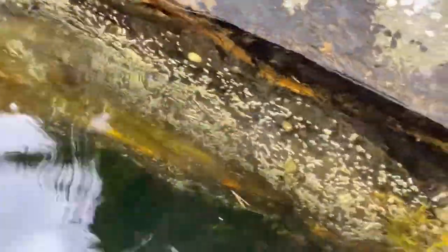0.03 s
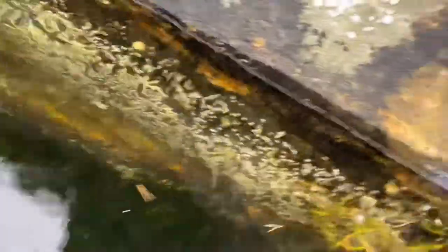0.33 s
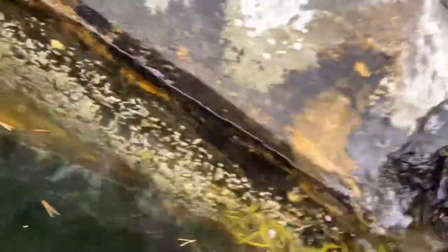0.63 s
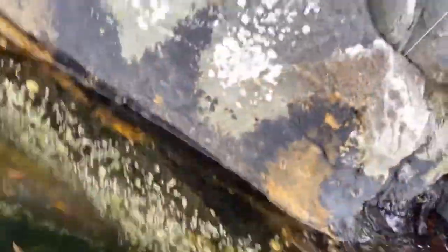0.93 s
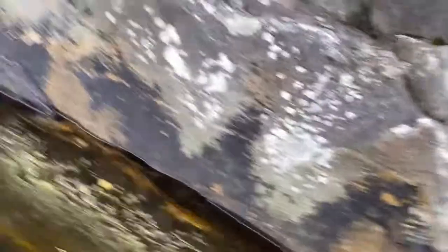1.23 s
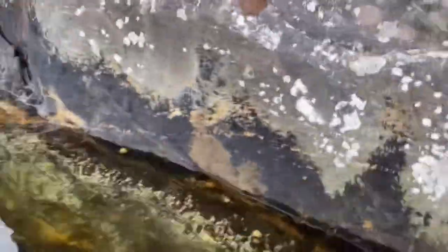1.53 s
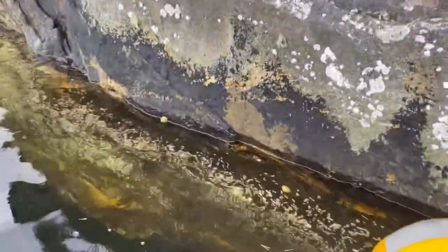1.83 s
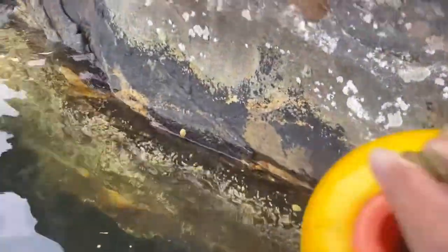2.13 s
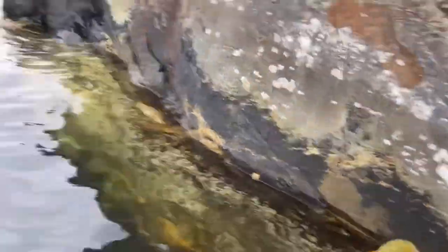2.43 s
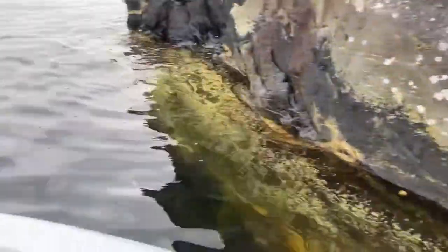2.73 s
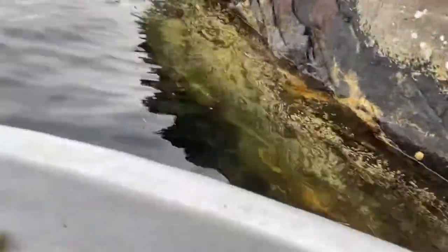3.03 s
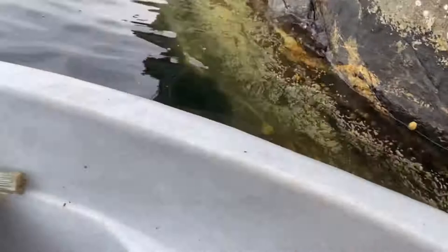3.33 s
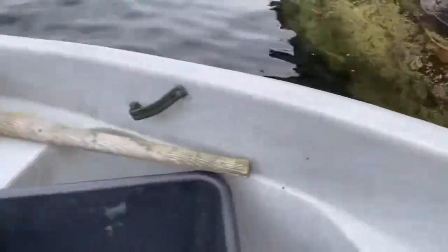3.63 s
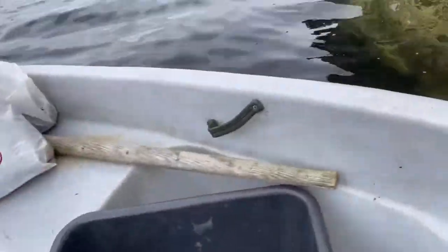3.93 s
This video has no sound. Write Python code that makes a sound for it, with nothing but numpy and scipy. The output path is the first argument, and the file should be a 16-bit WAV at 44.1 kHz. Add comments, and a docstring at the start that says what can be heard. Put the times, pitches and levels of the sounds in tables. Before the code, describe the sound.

Water washing and dripping beside a boat, with low rumble and gear knocking the hull.

```python
"""A small open boat lies beside a rock face. From the start wind rumbles, a low motor-like hum grows,
and water washes and drips on the rock, its bubbles ringing as tiny resonators. Gear bumps the hull,
softly at first, each impact exciting the hull's damped modes. Near 3.3 s and 3.6 s come two hard
clattering knocks that make the recorder's gain control duck."""
import sys
import numpy as np
from scipy import signal
from scipy.fft import rfft, irfft
from scipy.io import wavfile
from scipy.ndimage import uniform_filter1d

SR = 44100
rng = np.random.default_rng(int(sys.argv[2]) if len(sys.argv) > 2 else 0)


def inscribe(sig):
    """Save sig as 16-bit PCM at rate SR to the path in sys.argv[1].

    A 1-D sig is mono; a 2-D sig holds one channel per row.
    Samples are clipped to [-1, 1] before scaling.
    """
    pcm = np.round(np.clip(np.atleast_2d(sig).T, -1, 1) * 32767)
    wavfile.write(sys.argv[1], SR, pcm.astype(np.int16))


N = 176400
T = np.arange(N) / SR

# normal modes of the hull (frequency [Hz], level [dB], t60 [s])
HULL_MODES = [(71.9, -5, 0.99), (84.6, 7, 0.19), (107.2, 4, 0.26), (116.8, -28, 0.39), (169, -25, 0.2),
              (221, -5.5, 0.23), (259.6, -6, 0.3), (306, -16.5, 0.48), (359, -7, 0.19), (397, -1.5, 0.077),
              (463, -28.5, 0.21), (512, -14.5, 0.085), (637, -17.5, 0.15), (773, -18, 0.09)]
# bands of dense panel vibration (centre [Hz], level [dB], t60 [s])
PANEL_BANDS = [(47, -13, 0.41), (95.6, -8, 0.67), (192, -6, 0.41), (417, -9.5, 0.27), (850, -13.5, 0.11),
               (1690, -15, 0.15), (3130, -1, 0.1)]
# blows on the hull (time [s], level [dB], bass boost [dB], low-pass [Hz], note [Hz], note level [dB],
# bending wave level [dB], sweep time [s], twice the pan [dB])
KNOCKS = [(0.277, -28, -2, 1320, 1310, -6.5, -28, 0.0064, 8),
          (0.644, -29, -1, 119, 66.8, 19.5, -8, .008, 2), (.733, -27, 0, 308, 170.4, 11, 2, 0.00595, -17),
          (1.424, -24.5, 6, 370, 147.6, 11, 6.5, 0.0052, -1),
          (1.854, -20.5, 0, 1120, 521, 0, 4, 0.0059, -0.5),
          (1.866, -23, -1, 298, 227, 6.5, -13, 0.0062, -1), (1.916, -24, 5, 1300, 970, -11, 17, 0.0062, -4),
          (1.923, -16, 3.5, 203, 119.7, 2, -14, .006, 3), (1.947, -22, -1, 241, 201, 8, -4, 0.0041, -4),
          (2.238, -26.5, 6, 616, 208, 4, 0, 0.0061, -4), (2.257, -22, 5, 426, 181.6, 8, -3, 0.00713, 1),
          (2.532, -34, 16, 600, 392, 8, -16, 0.00626, -3), (2.755, -24, -4, 585, 97.6, 9, -10, 0.0066, -8),
          (3.121, -16.5, -9, 328, 372, 5.5, 10.5, 0.0044, -6),
          (3.144, -19.5, -2.5, 230, 103, 10.5, 10.5, 0.0044, 2),
          (3.165, -18.5, 10, 1340, 773, -8.5, 3.5, 0.00612, 3),
          (3.19, -26.5, 7, 258, 80.6, 7, 1, 0.0039, -6), (3.229, -17, 6, 330, 363, 1.5, -10, .006, -6),
          (3.25, -19.5, -5, 800, 584, -2, -3, 0.0052, -7),
          (3.265, -2.5, -1, 845, 717.5, -3.5, 4.5, .005, -5.5),
          (3.277, -12, 0, 500, 425, 6.5, 15.5, 0.0039, 3),
          (3.305, -13.5, -3, 388, 301, 9.5, -5, 0.0058, -2),
          (3.345, -16, -3.5, 380, 105, 10, -10, 0.0055, 5), (3.431, -27, 19, 403, 107.4, 5, -6, 0.0056, -1),
          (3.574, -12, 4.5, 700, 630, 3, 8.5, 0.00815, -6.5),
          (3.597, -9, -2, 528, 319, 3.5, -0.5, 0.0063, -6),
          (3.628, -13.5, 2.5, 320, 81, 1, 4, 0.00506, 0.5), (3.655, -16, 6.5, 580, 112, -3, -11, .0075, -4),
          (3.707, -13.5, -7, 600, 303, 9, -8, 0.0068, 6), (3.733, -19.5, 2.5, 308, 308, -14, 3, 0.0052, 0),
          (3.915, -22.5, -22, 915, 480, 2, -8, 0.0058, -8),
          (3.928, -15.5, 6, 330, 90.3, 1, 2.5, 0.0056, 0.5)]
def knock(db, bass_db, lowpass_hz, note_hz, note_db, bend_db, sweep_s):
    """Modal response: a blow rings the hull and the struck spot; soft contacts miss the high modes."""
    t = T[:SR // 2]
    def envelope(hz, level_db, t60):
        return amp(level_db - 60 * t / t60) * (1 - np.exp(-t * hz))  # builds over one cycle
    ring = np.zeros((2, len(t)))
    for hz, level_db, t60 in HULL_MODES:
        detuned_hz = hz * (1 + 0.0097 * rng.standard_normal())
        ring += envelope(hz, level_db, t60) * np.sin(2 * np.pi * (detuned_hz * t + rng.random()))
    for hz, level_db, t60 in PANEL_BANDS:
        band = by_hz([(hz / 2, 0), (hz, 1), (hz * 2, 0)], len(t))
        contact = envelope(hz, level_db=-8.5, t60=0.055)
        ring += (envelope(hz, level_db, t60) + contact) * noise(band, len(t))
    bass_shelf = amp(bass_db / (1 + (np.fft.rfftfreq(SR, 1 / SR) / 162) ** 4))  # corner at 162 Hz
    ring = irfft(rfft(ring, SR) * bass_shelf)[:, :len(t)]
    ring = signal.sosfilt(signal.butter(3, lowpass_hz, fs=SR, output="sos"), ring)
    note = envelope(note_hz, note_db, t60=0.048 + 14 / note_hz) * np.sin(2 * np.pi * note_hz * t)
    return amp(db) * (amp(-3) * ring + note + bending_wave(bend_db, sweep_s))


def bending_wave(db, sweep_s, end_hz=67.8, fall_hz=892):
    """Dispersion: treble outruns bass through the hull, giving one short falling thud."""
    sweeps = T[:SR // 2] / sweep_s
    cycles = np.cumsum(end_hz + fall_hz * np.exp(-sweeps)) / SR
    age = sweeps / 2.47  # 1 at the envelope's peak
    arch = age * np.exp((1 - age ** 2) / 2)
    return amp(db) * arch ** 3 * np.sin(2 * np.pi * cycles)


# spectrum of a clack's sharp edge (frequency [Hz], level [dB])
EDGE_SPECTRUM = [(300, 8.5), (1200, 4), (3000, 2.5), (4500, 2), (6500, 6.5), (9000, -0.5), (12800, 0.5),
                 (14200, -2), (16000, -37)]
# clacks of gear and slaps of water (time [s], level [dB], pitch [Hz], edge level [dB], pan [dB])
CLACKS = [(0.165, -27, 2800, -1.5, -3), (0.238, -39.5, 5800, 1, -1), (0.2785, -28, 3280, -1.5, -3),
          (0.3157, -25.5, 3860, -7, 1), (0.595, -37, 3980, 2, -3), (.7113, -32, 3330, -9, -2),
          (.731, -41.5, 4960, 5.5, 6), (0.8104, -32.5, 3390, -1.5, 1), (0.8985, -16.5, 3370, -6.5, 2),
          (0.9132, -41, 6500, 2, 0), (0.9248, -36, 7900, 4, 4), (.9375, -42, 6260, -8, 3),
          (.964, -36, 11200, 3, -2), (1.001, -42, 13000, 1, 0), (1.0224, -30, 4350, 0.5, -1),
          (1.1689, -35.5, 2090, 2, -1), (1.1887, -23.5, 4200, -17, -2), (1.424, -41, 2580, 6, -6),
          (1.473, -50, 2980, -4, -5), (1.644, -36, 2800, -5, -4), (1.817, -43, 4500, -14, 2),
          (1.855, -29.5, 2010, -28, 0), (1.9052, -29, 3940, -11, 1), (1.973, -39.5, 4600, -20, 0),
          (2.03, -37.5, 3120, 3, 0), (2.062, -40.5, 4150, -12, 0), (2.08, -33, 2010, -13, 2),
          (2.092, -34.5, 2680, -12, -2), (2.2379, -29.5, 2350, -5.5, -3.5), (2.2696, -23, 2170, 1.5, -4.5),
          (2.2772, -39.5, 2100, 10, 9), (2.29, -38, 2580, 3, -4), (2.356, -44, 3540, 1, -1),
          (2.413, -45.5, 4200, 7, 5), (2.491, -40.5, 6050, -9, 5), (2.767, -34.5, 3380, -6, -10),
          (2.978, -30, 2170, 0, 0), (3.12, -26, 1810, -12.5, -1), (3.168, -31, 1730, -23, 1),
          (3.2135, -29.5, 6600, -3, -1), (3.251, -39, 1560, 8.5, 1), (3.2655, -15, 3060, 1.5, 0),
          (3.279, -30, 2980, 5, -1), (3.4602, -39, 2000, 9.5, -4), (3.5734, -6.5, 2200, -3.5, 2.5),
          (3.5732, -11, 3050, -10.5, -1), (3.576, -16, 1200, -28, -8), (3.6027, -23, 1870, 1.5, -10),
          (3.607, -33, 6000, 11, 5), (3.6558, -16.5, 2000, -13, -0.5), (3.708, -25.5, 2000, -12, -3)]
def clack(db, hz, edge_db, q=5.3, rise_s=0.00043):
    """Impulse response: a broadband edge, a damped resonance, then scattering from boat and rock."""
    n = SR // 5
    t, f = T[:n], np.fft.rfftfreq(n, 1 / SR) + 1
    def burst(spectrum, level_db, t60):
        return noise(spectrum, n) * amp(level_db - 60 * t / t60)
    resonance = 1 / (1 + (q * (f / hz - hz / f) / 2) ** 2)
    resonance /= 1 + (f / hz / 2) ** 4  # steeper upper skirt
    edge = amp(by_hz(EDGE_SPECTRUM, n))
    direct = burst(resonance, 0, t60=0.018) + burst(edge, edge_db, t60=0.013)
    scatter = burst(resonance + 0.5 * amp(edge_db) * edge, -17, t60=0.11)
    return amp(db) * (direct + scatter) * (1 - np.exp(-t / rise_s))


# spectra of the moving water (frequency [Hz], level [dB])
WASH_SPECTRUM = [(700, -4.5), (1300, -5), (2050, -0.5), (2800, -4), (4000, -5.5), (5000, -6), (7000, -10),
                 (8200, -5.5), (9500, -54), (16000, -63)]
SPRAY_SPECTRUM = [(6000, -26), (9200, -12), (10500, -10), (12900, -6), (13800, -9), (15000, -23),
                  (16500, -35)]
GURGLE_SPECTRUM = [(250, -7), (600, -1.5), (1000, 2.5), (1500, -1), (2500, -32)]
HOLLOW_SPECTRUM = [(1300, -27), (1750, -5.5), (2050, -4), (2350, -10), (2900, -33)]
# envelopes of the spray and the hollow resonance between boat and rock (time [s], relative level [dB])
SPRAY_LEVEL = [(0, -83.5), (0.15, -58), (0.42, -59), (0.57, -51), (0.7, -61), (0.84, -55), (0.92, -44),
               (1.02, -56), (1.1, -73), (1.2, -58), (1.55, -73), (1.76, -55), (1.85, -72), (1.97, -45.5),
               (2.15, -64), (2.27, -80), (2.58, -64), (2.77, -53), (2.88, -64), (3.03, -50), (3.2, -53),
               (3.32, -75), (3.42, -75), (3.55, -56), (3.61, -60.5), (3.75, -58), (3.98, -58)]
HOLLOW_LEVEL = [(0, -64), (1.0, -56.5), (1.6, -59), (2.08, -52.5), (2.25, -55), (2.7, -53.5), (3.0, -61.5),
                (3.2, -47), (3.35, -58), (3.65, -50.5), (4.0, -54)]
# envelopes of wash and gurgle (time [s], relative wash level [dB], relative gurgle level [dB])
WATER_LEVELS = [(0.0, -61.5, -60.5), (0.17, -54, -52), (0.32, -52.5, -59), (0.6, -50.5, -58.5),
                (0.88, -51, -52.5), (1.0, -49.5, -54), (1.26, -53, -55), (1.45, -52, -57.5),
                (1.7, -59, -57.5), (1.96, -52.5, -55.5), (2.28, -58.5, -56.5), (2.39, -54, -52),
                (2.85, -52, -52), (3.13, -47, -46), (3.25, -47, -47.5), (3.35, -58, -47), (3.5, -50, -49.5),
                (3.63, -43.5, -35), (3.77, -51.5, -47.5), (4.0, -49, -47)]
def water():
    """Amplitude modulation: four noises swell on their own curves; the hiss dips briefly after 3.3 s."""
    wash = patchy_noise(WASH_SPECTRUM) * amp(over_time(WATER_LEVELS) - 1)
    spray = patchy_noise(SPRAY_SPECTRUM) * amp(over_time(SPRAY_LEVEL) - 7)
    gurgle = patchy_noise(GURGLE_SPECTRUM) * amp(over_time(WATER_LEVELS, column=2) + 1)
    hollow = patchy_noise(HOLLOW_SPECTRUM) * amp(over_time(HOLLOW_LEVEL))
    return (wash + spray + gurgle + hollow) * amp(2.5 * drift(rate_hz=18.7))


# envelope of the fizz against the wash (time [s], relative level [dB])
FIZZ_LEVEL = [(0, -1), (1.2, 0), (2.2, -2), (2.9, 1), (4.0, -4.5)]
def fizz(bubbles_per_s=380, splashes_per_s=16, centre_hz=3084, trials=2400):
    """Shot noise: tiny bubbles and splashes occur at random, their level following the wash."""
    out = np.zeros((2, N))
    level_db = over_time(WATER_LEVELS) + over_time(FIZZ_LEVEL)
    uniform, normal = rng.random((trials, 3)), rng.standard_normal((trials, 3))
    for (when, chance, rarity), (pitch, life, side) in zip(uniform, normal):
        s, db = when * N / SR, level_db[int(when * N)]
        hz = np.clip(centre_hz * 2 ** (0.85 * pitch), 500, 9000)
        strength = min(-np.log(rarity), 3.5)
        if chance < bubbles_per_s * N / SR / trials:
            t60 = 23 / hz * np.exp(0.5 * life)  # about 23 cycles
            add(out, s, bubble(db + 1.5 + 4 * strength, hz, t60, glide=1.5), pan_db=3 * side - 2)
        if chance < splashes_per_s * N / SR / trials:
            add(out, s, clack(db + 7 + 2 * strength, hz, edge_db=0), pan_db=-2)
    return out


# clear bubbles and drips (time [s], level [dB], pitch [Hz], t60 [s], relative glide [1/s])
BUBBLES = [(0.239, -25, 496, 0.12, -0.5), (0.282, -23.5, 455, 0.051, -7.5), (.426, -27, 947, 0.035, 14),
           (.428, -37, 2070, .04, 3), (.496, -34.5, 6020, .02, 3), (0.505, -35, 5250, 0.023, -3),
           (.535, -37.5, 5670, 0.032, -2), (0.5834, -34, 3660, 0.033, -1), (.8824, -43, 2120, .05, 14),
           (0.898, -2.5, 3390, 0.0057, -11), (.908, -32, 2920, 0.034, 1), (0.925, -21.5, 4970, 0.011, 4),
           (.934, -35, 2260, 0.055, -5), (0.961, -31, 868, 0.078, 10.5), (.986, -34, 2110, 0.043, 2),
           (1.065, -39, 605, 0.16, 0.5), (1.19, -37, 2840, 0.024, -5), (2.079, -34, 1950, 0.079, 3.5),
           (1.222, -28, 1080, 0.025, -2), (2.588, -35.5, 898, 0.12, 11), (2.829, -36, 1100, 0.085, 9)]
def bubble(db, hz, t60, glide, rise_s=0.0011):
    """Damped oscillation of trapped air; an upward glide marks a bubble nearing the surface."""
    t = T[:int(t60 * SR) + 2]
    envelope = amp(db - 60 * t / t60) * (1 - np.exp(-t / rise_s))
    return envelope * np.sin(2 * np.pi * hz * t * (1 + glide * t / 2))


# spectra of wind and slosh (frequency [Hz], level [dB])
WIND_SPECTRUM = [(15, -21), (32, -9), (48, -5), (62, 12), (80, 10), (105, 1), (150, -0.5), (220, -19.5),
                 (400, -49.5)]
SLOSH_SPECTRUM = [(100, 0.5), (200, 1.5), (290, 1), (390, -5), (480, -13.5), (650, -18.5), (1200, -65)]
# their envelopes (time [s], relative wind level [dB], relative slosh level [dB])
RUMBLE_LEVELS = [(0.0, -37, -37.5), (0.6, -27, -39), (0.79, -34, -39.5), (1.79, -27, -37),
                 (2.24, -36.5, -35), (2.45, -29.5, -27.5), (2.8, -23, -36), (3.14, -36, -35),
                 (3.34, -29, -28.5), (4.0, -34, -34)]
def rumble():
    """Turbulence: gusting wind and water sloshing under the hull give uneven low noise."""
    wind = noise(amp(by_hz(WIND_SPECTRUM, N)), N)
    wind *= amp(over_time(RUMBLE_LEVELS) - 1.5 + 4 * drift(rate_hz=6.6))
    slosh = noise(amp(by_hz(SLOSH_SPECTRUM, N)), N)
    slosh *= amp(over_time(RUMBLE_LEVELS, column=2) - 2 + 2.86 * drift(rate_hz=8.1))
    return wind + slosh


# partials of the hum (frequency [Hz], level at the start [dB], level from 3 s on [dB])
HUM_PARTIALS = [(60.5, -38.5, -26), (86.8, -54, -43), (118.4, -44.5, -33.5), (181.6, -42, -42),
                (214.7, -53, -46.5), (288.8, -46, -52), (366, -59, -46.5), (399.4, -66, -44.5)]
def hum():
    """Superposition: low tones waver in frequency and amplitude, as of an idling motor."""
    out = np.zeros(N)
    for hz, early_db, late_db in HUM_PARTIALS:
        cycles = np.cumsum(hz * (1 + 0.015 * drift(rate_hz=16.1))) / SR + rng.random()
        level_db = np.interp(T, [0, 3], [early_db, late_db]) + 2.5 * drift(rate_hz=4.3)
        out += amp(level_db) * np.sin(2 * np.pi * cycles)
    return np.sqrt(2) * out


# likeness of the two channels (frequency [Hz], correlation [0-1])
COHERENCE = [(60, 0.84), (250, 0.94), (500, 0.26), (1000, 0.5), (2000, 0.33), (4000, 0.66), (7000, 0.62),
             (9000, 1), (12000, 0.72)]
def noise(gain, n):
    """Partial coherence: random-phase mid and side signals form stereo noise of a given spectrum."""
    mid, side = np.exp(2j * np.pi * rng.random((2, n // 2 + 1)))
    coherence = by_hz(COHERENCE, n)
    mid, side = mid * np.sqrt(1 + coherence), side * np.sqrt(1 - coherence)
    return unit(irfft(np.array([mid + side, mid - side]) * gain, n))


def patchy_noise(spectrum, depth_db=3.5):
    """Spectral modulation: the colour of a noise shifts in small random patches."""
    frames = dict(nperseg=512, noverlap=384)
    cells = signal.stft(noise(amp(by_hz(spectrum, N)), N), **frames)[2]
    patches = uniform_filter1d(rng.standard_normal(cells.shape[:0:-1]), size=7, axis=0)  # over time
    patches = uniform_filter1d(patches, size=6, axis=1)  # over frequency
    return unit(signal.istft(cells * amp(depth_db * unit(patches).T), **frames)[1][:, :N])


def drift(rate_hz):
    """Low-passed noise: a slow wander of rms 1."""
    f = np.fft.rfftfreq(N, 1 / SR)
    return unit(irfft(rfft(rng.standard_normal(N)) * (f > 0) * np.exp(-(f / rate_hz) ** 2), N))


def amp(db):
    """Decibels to amplitude ratio."""
    return 10 ** (np.asarray(db) / 20)


def unit(x):
    """Normalisation to rms 1."""
    return x / np.sqrt(np.mean(x ** 2) + 1e-20)


def by_hz(points, n):
    """Interpolation over log frequency at the bins of n samples."""
    f, value = np.transpose(points)
    return np.interp(np.log(np.fft.rfftfreq(n, 1 / SR) + 1), np.log(f), value)


def over_time(rows, column=1):
    """Interpolation of one column at every sample."""
    rows = np.array(rows)
    return np.interp(T, rows[:, 0], rows[:, column])


def add(mix, s, sound, pan_db=0):
    """Level panning: a sound enters at time s, its left channel pan_db above its right."""
    part = mix[:, max(round(s * SR), 0):][:, :sound.shape[-1]]
    part += (sound * amp([[pan_db / 2], [-pan_db / 2]]))[:, :part.shape[1]]


def scene():
    """Linear superposition of wind, hum, impacts and water."""
    mix = rumble() + hum()
    for s, *blow, double_pan_db in KNOCKS:
        add(mix, s, knock(*blow), double_pan_db / 2)
    for s, db, hz, edge_db, pan_db in CLACKS:
        add(mix, s, clack(db, hz, edge_db), pan_db)
    mix += water() + fizz()
    for s, *shape in BUBBLES:
        add(mix, s, bubble(*shape))
    return mix


# left microphone port against the right (frequency [Hz], phase lead [rad])
PORT_PHASE = [(40, 0), (400, 0.5), (800, 0.28), (1500, 1.48), (2500, -0.56), (4300, 0), (5200, -1.83),
              (6200, 0), (6900, 1), (7500, 2), (8300, 3.5), (9400, 3), (10500, 5), (11300, 6.5), (13500, 3),
              (14300, -11)]
# the same ports (frequency [Hz], level difference [dB])
PORT_BALANCE = [(60, -1), (130, 3), (280, -1.5), (500, -3.5), (800, -7), (1100, -1), (2000, 1.5),
                (5000, -3.5), (12000, 1)]
def record(dry, threshold_db=-10.5, duck_share=0.68, recover_db_per_s=37, attack_s=0.0046, ceiling=0.84):
    """Compression: gain control ducks loud peaks from two microphone ports, then a soft ceiling acts."""
    n, sides = N + SR // 10, np.array([[0.5], [-0.5]])
    ports = np.exp(1j * by_hz(PORT_PHASE, n) * sides) * amp(by_hz(PORT_BALANCE, n) * sides)
    x = irfft(rfft(dry, n) * ports, n)[:, :N]
    x = signal.sosfilt(signal.butter(8, 14300, fs=SR, output="sos"), x)  # treble roll-off
    power_db = 10 * np.log10(abs(uniform_filter1d((x ** 2).mean(0), size=500)) + 1e-12)
    held_db = np.maximum.accumulate(power_db + recover_db_per_s * T) - recover_db_per_s * T
    excess_db = np.maximum(held_db - threshold_db, 0)
    pole = np.exp(-1 / (attack_s * SR))
    x = x * amp(-duck_share * signal.lfilter([1 - pole], [1, -pole], excess_db))
    x = x / (1 + (x / ceiling) ** 6) ** (1 / 6)
    band_limit = signal.firwin(511, 16400, window=("kaiser", 9), fs=SR)
    return signal.oaconvolve(x, band_limit[None], "same")


dry = scene()
out = record(dry)
inscribe(out)
```